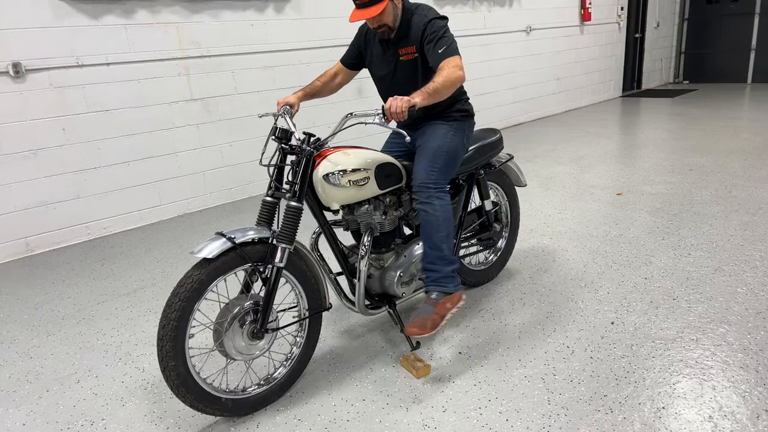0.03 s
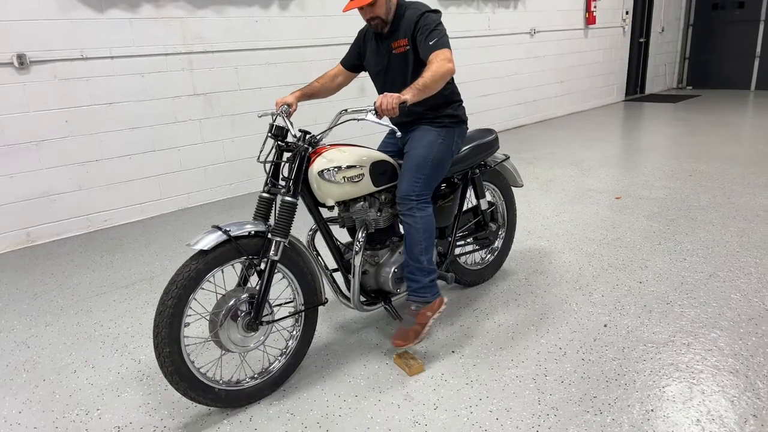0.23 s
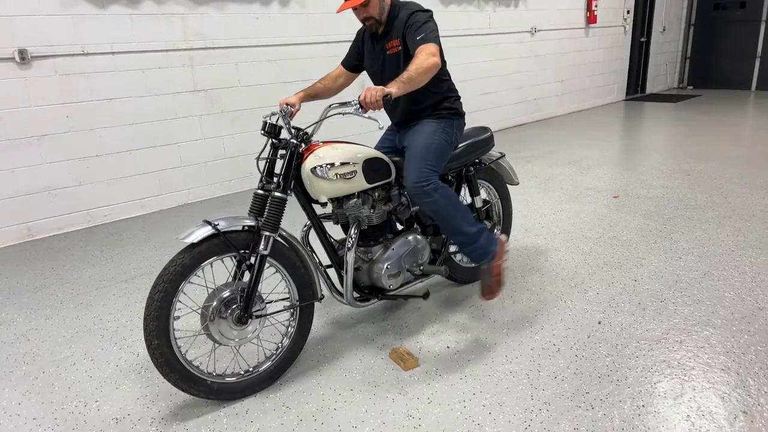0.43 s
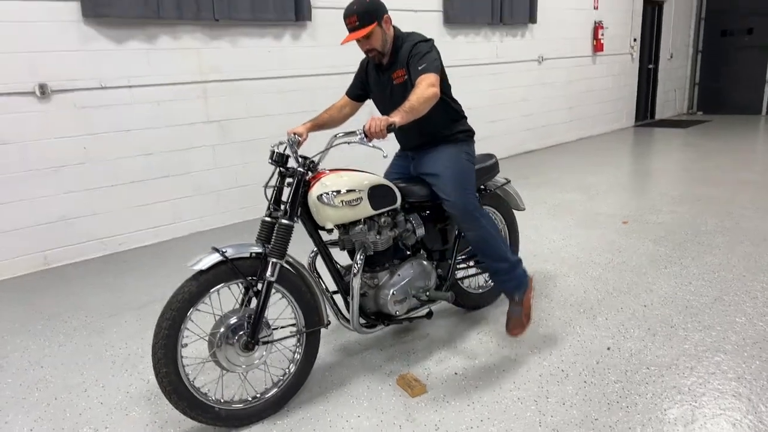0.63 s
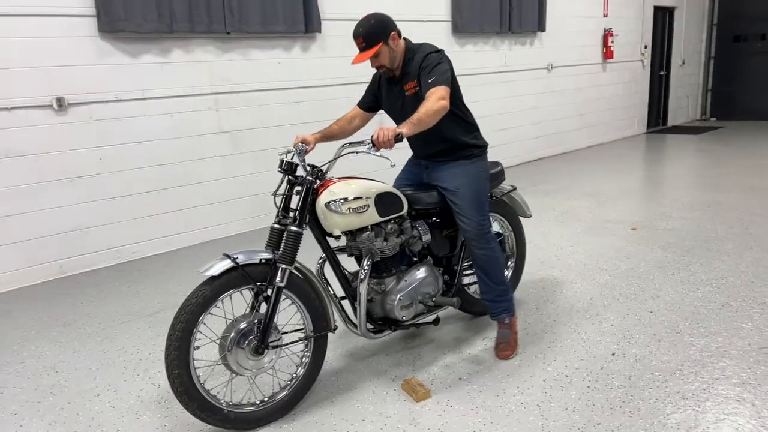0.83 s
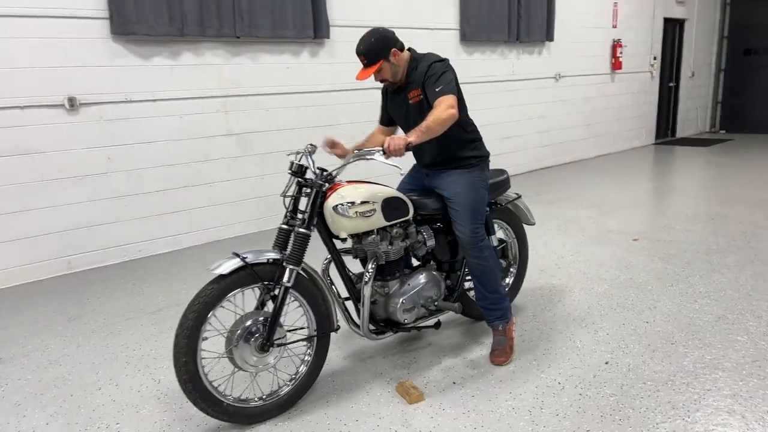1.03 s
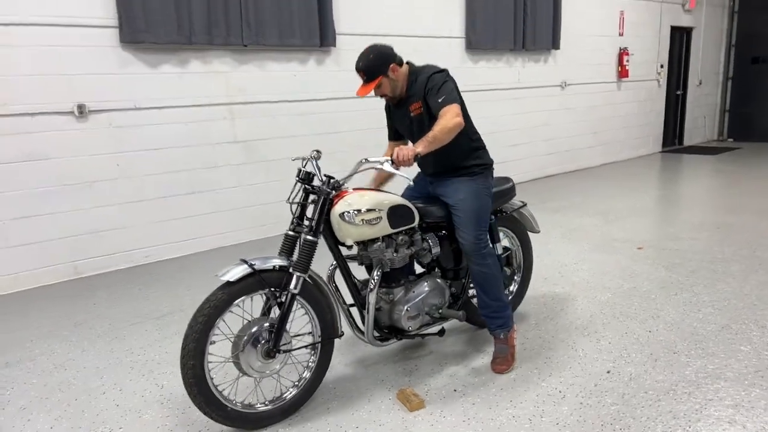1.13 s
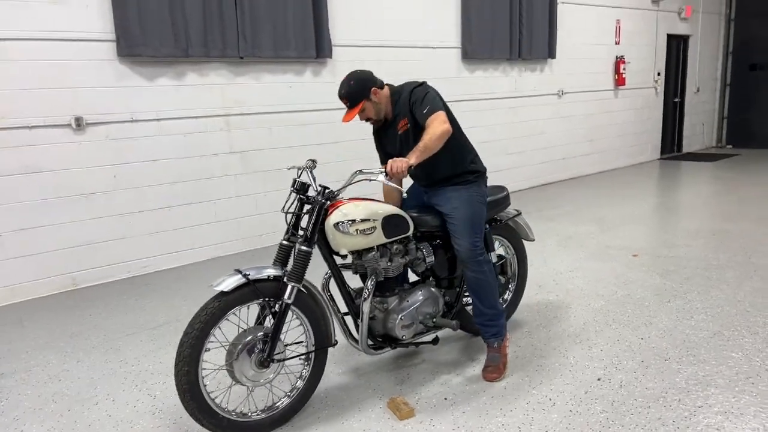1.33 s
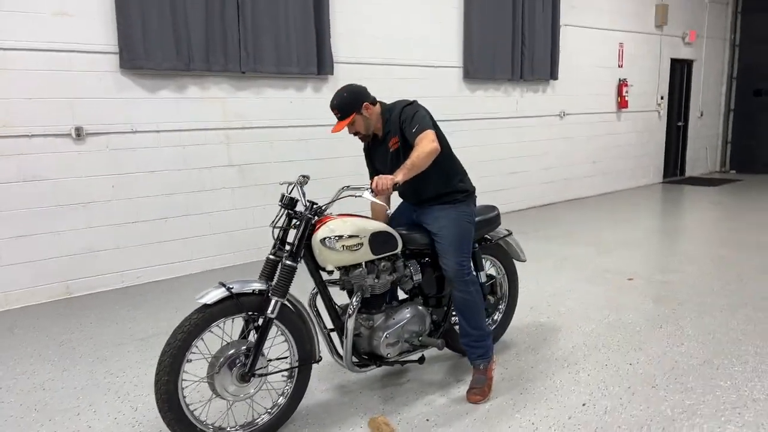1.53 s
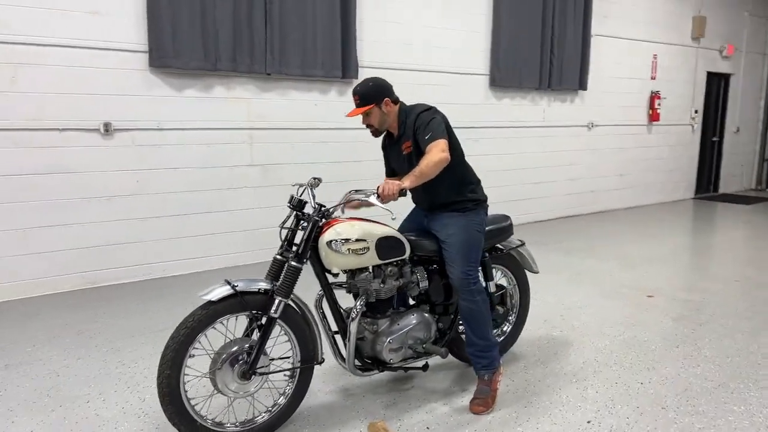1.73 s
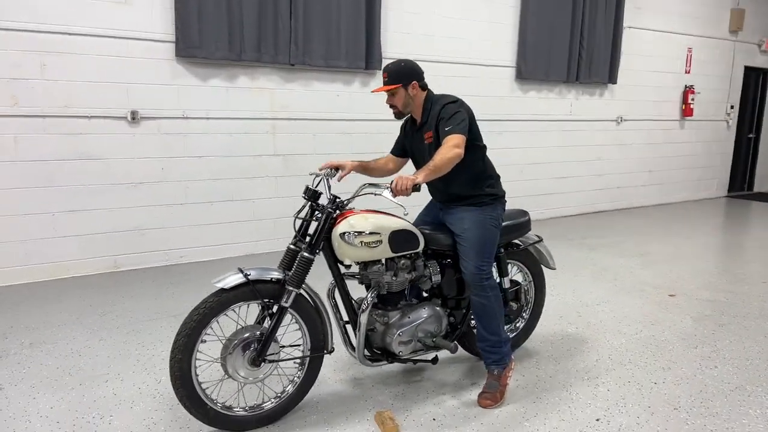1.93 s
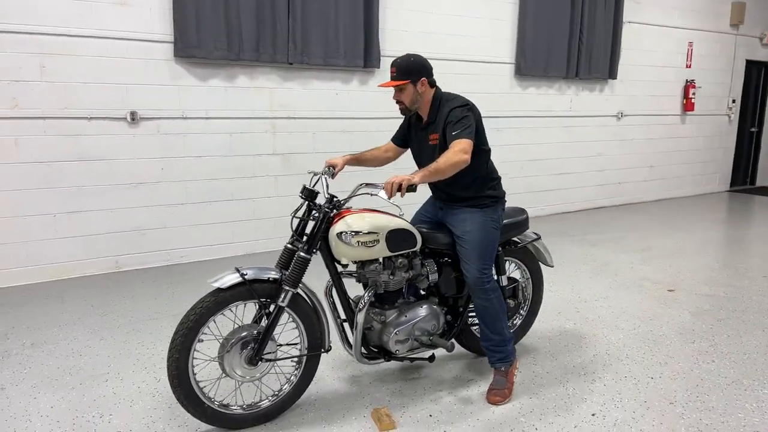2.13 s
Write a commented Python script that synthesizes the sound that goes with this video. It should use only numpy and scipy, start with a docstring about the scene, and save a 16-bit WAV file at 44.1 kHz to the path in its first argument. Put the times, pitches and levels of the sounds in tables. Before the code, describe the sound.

A motorcycle side stand scrapes and clinks, then slams up with a sharp steel clank at 0.2 seconds, rebounding with a spring rattle and echoing through a large garage. Soft boot scuffs, ticks and a leather creak follow from 0.6 to 1.1 seconds. A lighter knock rings out at 1.2 seconds. Faint ticks, another creak and soft bumps come around 2 seconds, over a low ventilation hum.

```python
"""Motorcycle side stand in a garage.

The stand is kicked up: it scrapes, slams steel on steel against the frame and rebounds; its spring
rattles. The rider shifts his weight with scuffs, ticks and leather creaks; a second later the bike
gives a lighter knock. The large, hard-walled room rings over a low ventilation hum."""
import sys
import numpy as np
from scipy import signal
from scipy.fft import rfft, irfft
from scipy.io import wavfile
from scipy.ndimage import map_coordinates

SR = 44100
rng = np.random.default_rng(int(sys.argv[2]) if len(sys.argv) > 2 else 0)


def wav_out(sig):
    """Save sig, one row per channel (or a flat mono array), as 16-bit PCM at SR to the path in sys.argv[1]."""
    wavfile.write(sys.argv[1], SR, np.round(np.clip(np.atleast_2d(sig).T, -1, 1) * 32767).astype(np.int16))


N = 97020

# Table levels are relative.
# stand hitting the frame (time [s], level [dB])
STAND_BLOWS = [(.2050, -3.5), (.2076, 3), (.2722, -10)]
# stand and frame modes (frequency [Hz], level [dB], t60 [s])
STAND_MODES = [(183, -34.5, .2), (372, -35.5, 0.26), (568, -28.5, 0.073), (1033, -20.5, 0.017),
               (1455, -11.5, 0.022), (1590, -4, 0.016), (1888, -2, 0.024), (2343, -18, 0.068),
               (2820, -4, 0.035), (3320, -18, .03), (5950, -39, 0.036)]
# steel contact (frequency [Hz], level [dB])
STAND_SPECTRUM = [(100, -25), (500, -12), (850, -8), (1040, 1), (1250, -6), (1500, 1.5), (1900, 2.5),
                  (2250, -9), (2600, -7), (2850, -1.5), (3300, -9.5), (3800, -14.5), (4600, -21.5),
                  (6400, -19), (8100, -28.5), (9900, -26), (12500, -41), (15000, -37)]
# spring rattle (time [s], level [dB])
RATTLES = [(.2725, 3), (.2785, -2), (.292, -14)]
# spring rattle (frequency [Hz], level [dB])
RATTLE_SPECTRUM = [(100, -11), (350, -6.5), (1000, -4), (2400, -13), (3700, 8.5), (4600, -19), (6500, -6),
                   (8500, -27), (10000, -18), (15000, -36)]
# frame shudder (time [s], level [dB])
SHUDDERS = [(.213, 0.5), (.274, 6)]
# frame shudder (frequency [Hz], level [dB])
SHUDDER_SPECTRUM = [(50, -19), (110, -6), (180, 10), (260, -8.5), (385, 5.5), (450, -10.5), (560, 12.5),
                    (800, -13), (1400, -10.5), (5000, -50)]
# lighter knock (time [s], level [dB])
KNOCKS = [(1.2038, -3), (1.2085, -2), (1.2185, -13)]
# knock modes (frequency [Hz], level [dB], t60 [s])
KNOCK_MODES = [(715, -13, 0.024), (1004, 2.5, 0.031), (1360, -5.5, 0.018), (1860, -9, 0.034),
               (1926, 2, 0.031), (3080, -1.5, 0.02), (6700, -12, 0.018)]
# knock contact (frequency [Hz], level [dB])
KNOCK_SPECTRUM = [(200, -26), (700, -7), (2000, 5.5), (4200, -19), (6200, -11), (8200, -16), (10000, -15.5),
                  (12500, -42), (15000, -31)]
# metal clinks (time [s], level [dB])
CLINKS = [(.1125, 2.5), (.117, 0.5), (.427, -2.5), (1.265, -11)]
# metal clinks (frequency [Hz], level [dB])
CLINK_SPECTRUM = [(1000, -14), (3300, 7), (4300, -9), (6300, 4), (8200, -18), (10100, -2.5), (11500, -22.5),
                  (15000, -21)]
# boot and chassis taps (time [s], level [dB])
TAPS = [(.064, -4), (.778, -9), (1.816, -25)]
# taps (frequency [Hz], level [dB])
TAP_SPECTRUM = [(100, -13), (600, -21.5), (1000, 0.5), (2200, -8), (4000, -32.5), (7000, -38.5),
                (14000, -49)]
# low bumps (time [s], level [dB])
BUMPS = [(.008, -8), (.055, -7), (2.144, -0.5), (2.161, -3), (2.178, -1.5)]
# bump modes (frequency [Hz], level [dB], t60 [s])
BUMP_MODES = [(181, 1.5, 0.057), (295, -3, 0.066), (420, -0.5, 0.022)]
# stand scrape (time [s], level [dB])
SCRAPE_ENVELOPE = [(0, -43), (.045, -48), (.065, -43), (.12, -41), (.2, -45), (.24, -88)]
# stand scrape (frequency [Hz], level [dB])
SCRAPE_SPECTRUM = [(60, -32), (180, -12), (350, -9.5), (1000, -0.5), (2000, -1), (3000, -8), (4200, -18),
                   (6200, -15.5), (8200, -24.5), (10000, -24.5), (12500, -34.5), (15000, -32)]
# boot and clothing scuffs (time [s], level [dB])
SCUFF_ENVELOPE = [(.55, -52.5), (.72, -51.5), (.79, -47), (.85, -49.5), (.93, -46.5), (1.02, -42.5),
                  (1.065, -47), (1.1, -53.5), (1.5, -77), (1.93, -66), (1.98, -46.5), (2.02, -45.5),
                  (2.06, -48), (2.1, -54.5), (2.2, -54.5)]
# scuffs (frequency [Hz], level [dB])
SCUFF_SPECTRUM = [(100, -6), (280, -6.5), (450, -13), (750, -3), (1800, -5), (3000, -11.5), (4200, -20.5),
                  (6000, -14), (8200, -26), (10000, -23), (12500, -35), (14500, -41)]
# close ticks (time [s], level [dB])
TICKS = [(.637, -4), (.668, 0), (.708, 3), (.817, 5.5), (.872, 1), (1.415, -4), (1.669, -7), (1.732, -3),
         (1.749, -4), (1.776, 3), (1.798, -0.5), (1.816, -3), (1.956, 0.5)]
# ticks (frequency [Hz], level [dB])
TICK_SPECTRUM = [(200, -2), (800, 14), (2500, -6), (4000, -15), (6000, 6), (8200, -11), (10000, -8),
                 (12500, -15), (14000, -7), (15800, -19)]
# small parts snapping (time [s], frequency [Hz], level [dB], t60 [s])
SNAPS = [(1.4152, 4100, -32, 0.0028), (1.914, 2010, -33.5, 0.007)]
# leather creaks (start [s], length [s], level [dB])
CREAKS = [(0.968, .10, -5.5), (1.973, .095, -4)]
# leather slip (frequency [Hz], level [dB])
CREAK_SPECTRUM = [(200, -8), (900, 3), (2000, -4), (3000, 1), (4200, -21), (6000, 9), (8200, -11),
                  (10000, -7.5), (12500, -19), (14000, -7), (15500, -21)]
# cloth swish (time [s], level [dB])
SWISH_ENVELOPE = [(1.83, -83), (1.87, -61.5), (1.895, -66), (1.93, -71), (1.99, -68), (2.06, -70),
                  (2.1, -92)]
# cloth swish (frequency [Hz], level [dB])
SWISH_SPECTRUM = [(3000, -45), (7000, 4), (10000, 2), (12500, 2), (14000, 5), (16000, -12)]
# wall and ceiling echoes (delay [s], level [dB])
ECHOES = [(.0105, -12.5), (.0185, -13), (.133, -19)]
# reverb decay (frequency [Hz], t60 [s])
ROOM_T60 = [(100, 1.8), (300, 1.2), (800, 1.55), (1800, 1.4), (3000, 1.44), (6000, 0.97), (14000, 0.66)]
# reverb colour (frequency [Hz], level [dB])
ROOM_SPECTRUM = [(60, 10), (200, 11), (500, 10.5), (1000, 4.5), (1800, 0.5), (3000, -2), (6000, -1),
                 (14000, -7)]
# ventilation tones (frequency [Hz], level [dB])
HUM_TONES = [(63.5, -49.5), (101, -57.5)]
# hum swell (time [s], level [dB])
HUM_ENVELOPE = [(0, 0), (.35, 2.5), (.62, 0.5), (.82, -8.5), (.91, -2.5), (1.3, 2), (1.84, 2.5), (1.95, -3),
                (2.2, -8)]
# air rumble (frequency [Hz], level [dB])
AIR_SPECTRUM = [(25, -38), (60, 7.5), (100, -2.5), (160, -7.5), (280, -6.5), (450, -21.5), (900, -17),
                (2000, -14.5), (4000, -28.5), (6500, -31.5), (9000, -41.5), (15000, -40.5)]


def steel_cracks():
    """Steel-on-steel chatter of stand, spring and knock."""
    stand = bursts(STAND_BLOWS, STAND_SPECTRUM, decay_s=0.0067)
    spring = bursts(RATTLES, RATTLE_SPECTRUM, decay_s=0.0042)
    knock = bursts(KNOCKS, KNOCK_SPECTRUM, decay_s=0.0033)
    return (route(stand, gain_db=8.5, send_db=0.5)
            + route(spring, gain_db=-8, send_db=-9)
            + route(knock, gain_db=-6.5, send_db=2))


def frame_vibration():
    """Struck parts ring briefly; the whole frame shudders under the slam."""
    shudder = bursts(SHUDDERS, SHUDDER_SPECTRUM, decay_s=0.093)
    return (route(ring(STAND_BLOWS, STAND_MODES), gain_db=-11.5, send_db=-1.5)
            + route(ring(KNOCKS, KNOCK_MODES), gain_db=-33, send_db=-1.5)
            + route(shudder, gain_db=-3.5, send_db=-16.5))


def handling_impacts():
    """Bright metal clinks and dull boot and chassis taps as the bike is moved; soft low bumps."""
    clinks = bursts(CLINKS, CLINK_SPECTRUM, decay_s=0.0083)
    taps = bursts(TAPS, TAP_SPECTRUM, decay_s=0.0026)
    return (route(clinks, gain_db=-15, send_db=-2)
            + route(taps, gain_db=-5.5, send_db=-0.5)
            + route(ring(BUMPS, BUMP_MODES), gain_db=-35, send_db=-7))


def stand_scrape():
    """The stand sticks and slips as it swings."""
    return route(friction(SCRAPE_ENVELOPE, SCRAPE_SPECTRUM), send_db=-1)


def rider_scuffs():
    """Boots and clothes rub as the rider shifts."""
    return route(friction(SCUFF_ENVELOPE, SCUFF_SPECTRUM), send_db=-6.5)


def ticks_and_snaps():
    """Close ticks; small parts snap in one damped mode each."""
    ticks = undb(-26) * bursts(TICKS, TICK_SPECTRUM, decay_s=0.0011)
    return ticks + sum(ring([(s, db)], [(hz, 0, t60_s)]) for s, hz, db, t60_s in SNAPS)


def leather_creak(slip_hz=85, jitter=0.12, scatter_db=2.5):
    """Leather sticks and slips under the rider: quick, uneven click trains."""
    slips = []
    for start_s, length_s, db in CREAKS:
        timing, strength = rng.standard_normal(size=(40, 2)).T
        gaps_s = (1 + jitter * timing) / slip_hz
        offsets_s = np.cumsum(gaps_s) - gaps_s[0]
        levels_db = db + scatter_db * strength
        slips += [(start_s + s, level) for s, level in zip(offsets_s, levels_db) if s < length_s]
    return undb(-23.5) * bursts(slips, CREAK_SPECTRUM, decay_s=0.0009)


def cloth_swish():
    """Faint, high cloth friction."""
    return friction(SWISH_ENVELOPE, SWISH_SPECTRUM)


def garage_reverb(send, build_s=0.002, size=512):
    """Diffuse room tail; treble dies first."""
    hz, t, noise = signal.stft(rng.standard_normal(N * 2 // 3), SR, nperseg=size)
    fade = np.exp(-np.log(1000) * t / on_log_axis(hz, ROOM_T60)[:, None])
    band_gain = undb(on_log_axis(hz, ROOM_SPECTRUM))[:, None]
    tail = signal.istft(noise * fade * band_gain, SR, nperseg=size)[1]
    onset = 1 - np.exp(-time_s()[:len(tail)] / build_s)
    return convolve(send, tail * onset / np.sqrt(SR / 10))


def ventilation(waver_db=1, drift_rad=0.27, air_db=-52.5):
    """Wavering low hum over soft air noise."""
    hum = np.zeros(N)
    for hz, db in HUM_TONES:
        amplitude = np.sqrt(2) * undb(db + waver_db * wander(rate_hz=7))
        hum += amplitude * np.sin(2 * np.pi * hz * time_s() + drift_rad * wander(rate_hz=3.9))
    air = undb(air_db) * colour(rng.standard_normal(N), AIR_SPECTRUM)
    return hum * gain_curve(HUM_ENVELOPE) + air


def bursts(blows, spectrum, decay_s):
    """Decaying noise per blow; overlaps add in power."""
    fade = np.exp(-2 * np.arange(int(10 * decay_s * SR) + 1) / SR / decay_s)
    power = place([(s, 2 * db) for s, db in blows], fade / fade.sum())
    return colour(np.sqrt(power) * rng.standard_normal(N), spectrum)


def ring(blows, modes, size=8192):
    """Blows excite decaying modes of alternating sign."""
    t = np.arange(size) / SR
    response = np.zeros(size)
    for k, (hz, db, t60_s) in enumerate(modes):
        fade = np.exp(-np.log(1000) * t / t60_s)
        response += (-1) ** k * undb(db) * np.sin(2 * np.pi * hz * t) * fade
    return place(blows, response)


def friction(envelope, spectrum, grains_per_s=1500, spread_db=3):
    """Dense stick-slip grains of uneven size."""
    impulses = (rng.random(N) < grains_per_s / SR) * rng.choice([-1, 1], N)
    grains = impulses * undb(spread_db * np.minimum(rng.exponential(size=N), 5))
    return colour(grains / grains.std() * gain_curve(envelope), spectrum)


def colour(x, spectrum, size=2048):
    """Minimum-phase filter of unit energy."""
    hz = np.arange(size // 2 + 1) * SR / size
    cepstrum = irfft(np.log(undb(on_log_axis(hz, spectrum))))
    cepstrum[1:size // 2] *= 2
    cepstrum[size // 2 + 1:] = 0
    response = irfft(np.exp(rfft(cepstrum)))
    return convolve(x, response / np.linalg.norm(response))


def place(events, shape):
    """One copy of shape per (time [s], level [dB]) row."""
    out = np.zeros(N)
    for s, db in events:
        start = int(np.clip(s * SR, 0, N - 1))
        out[start:start + len(shape)] += undb(db) * shape[:N - start]
    return out


def route(x, send_db, gain_db=0):
    """Two rows: direct sound, room send."""
    return undb(gain_db) * np.array([x, undb(send_db) * x])


def wander(rate_hz):
    """Smooth random curve, spread near 1."""
    knots = rng.standard_normal(size=256)
    return map_coordinates(knots, [time_s() * rate_hz], mode="mirror")


def gain_curve(envelope):
    """Gain per sample from (time [s], level [dB]) rows."""
    s, db = np.array(envelope, float).T
    return undb(np.interp(time_s(), s, db))


def on_log_axis(hz, table):
    """Interpolate over log frequency."""
    knots_hz, values = np.array(table, float).T
    return np.interp(np.log(np.maximum(hz, 1)), np.log(knots_hz), values)


def convolve(x, response):
    """Convolution cut to N samples."""
    return signal.oaconvolve(x, response)[:N]


def undb(db):
    """Decibels to gain."""
    return 10 ** (np.asarray(db) / 20)


def time_s():
    """Sample times."""
    return np.arange(N) / SR


def scene(directions=3):
    """Mono mix: direct sound, echoes, reverb, ventilation."""
    body, body_send = frame_vibration() + handling_impacts() + stand_scrape() + rider_scuffs()
    cracks, crack_send = steel_cracks()
    echoes = place(ECHOES, body_send + crack_send)
    tail = garage_reverb(body_send)
    for _ in range(directions):  # cracks radiate differently in each direction
        _, radiated = steel_cracks()
        tail += garage_reverb(radiated) / np.sqrt(directions)
    faint = ticks_and_snaps() + leather_creak() + cloth_swish()  # too weak to excite the room
    return (cracks + body + echoes + tail + faint + ventilation())[None]


def record(dry, low_cut_hz=43, ceiling=0.8, top_hz=15500):
    """Thin the deep bass, round the peaks, cut the top treble."""
    thinned = signal.sosfilt(signal.butter(2, low_cut_hz, "high", fs=SR, output="sos"), dry)
    rounded = ceiling * np.tanh(thinned / ceiling)
    return signal.sosfilt(signal.ellip(8, .2, 70, top_hz, fs=SR, output="sos"), rounded)


dry = scene()
out = record(dry)
wav_out(out)
```